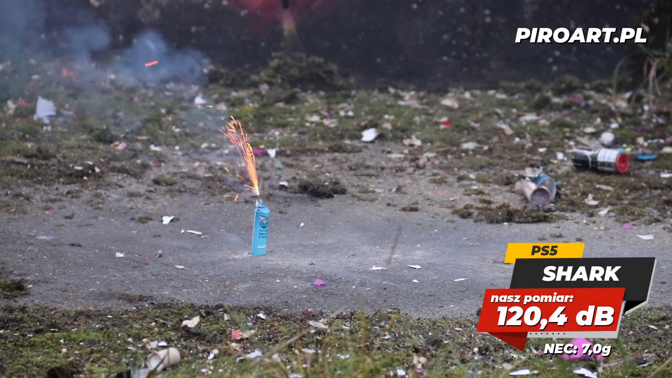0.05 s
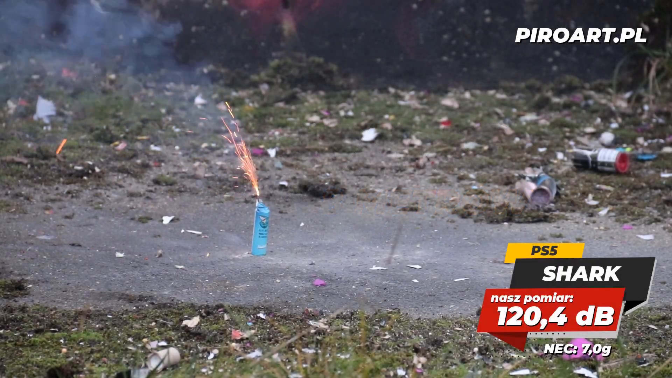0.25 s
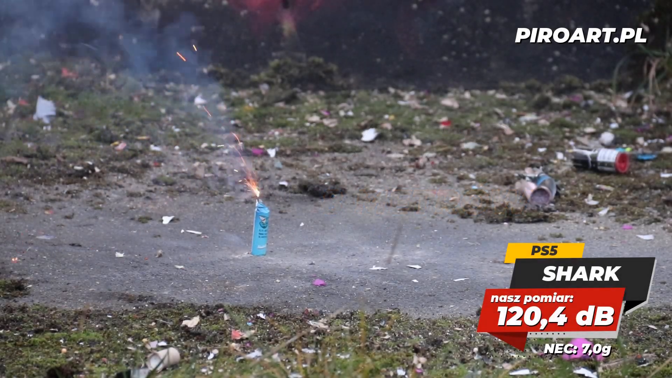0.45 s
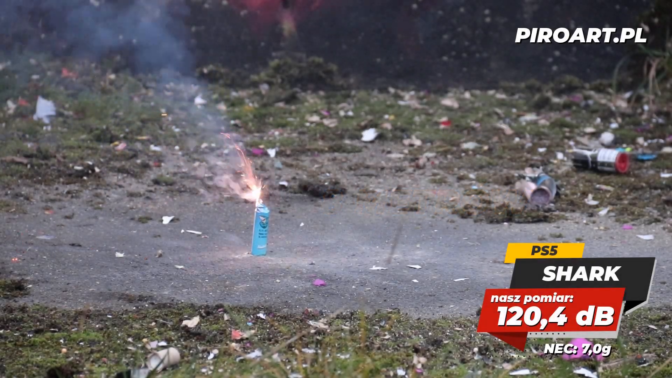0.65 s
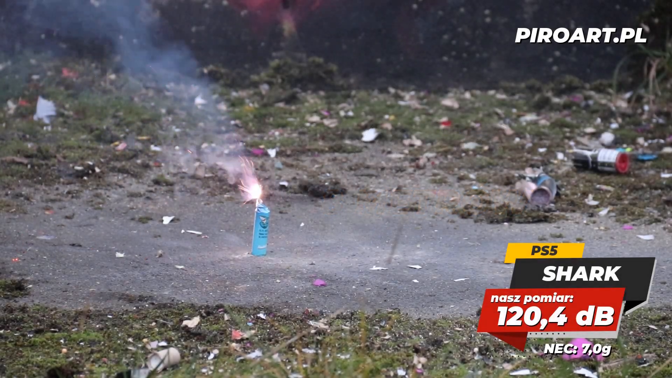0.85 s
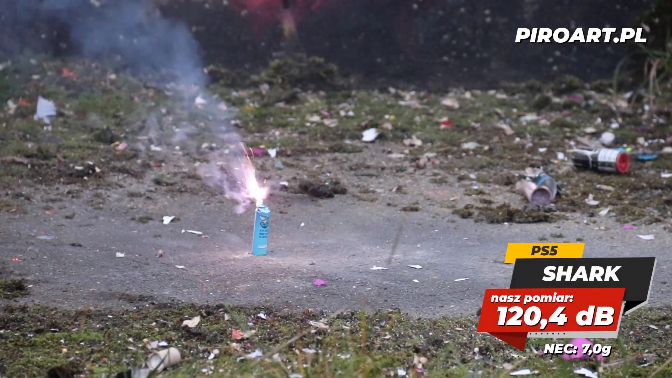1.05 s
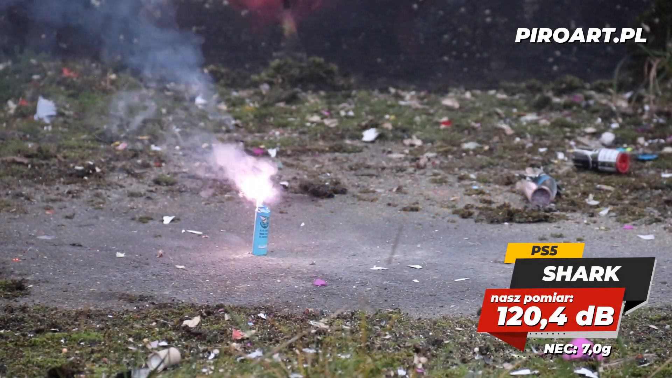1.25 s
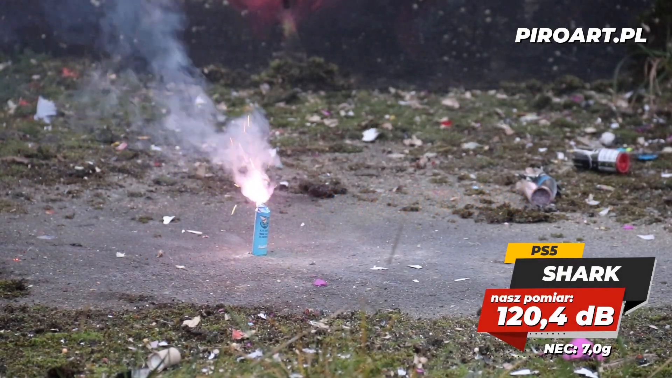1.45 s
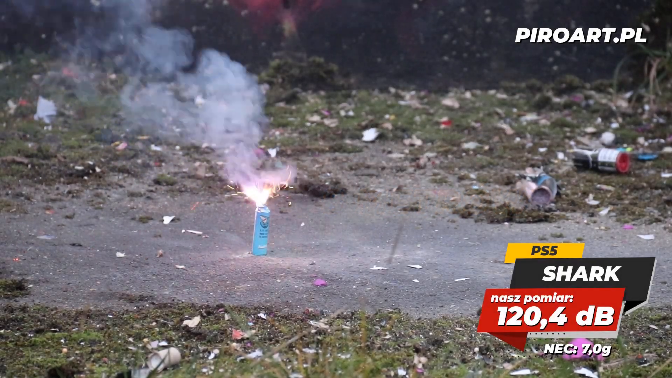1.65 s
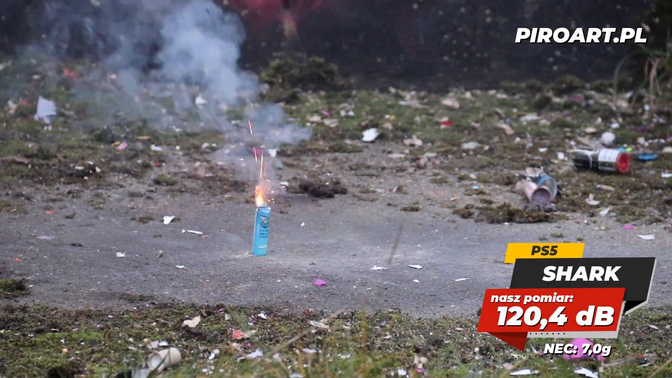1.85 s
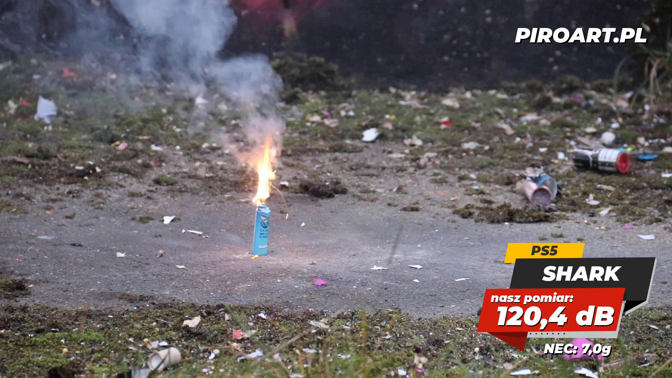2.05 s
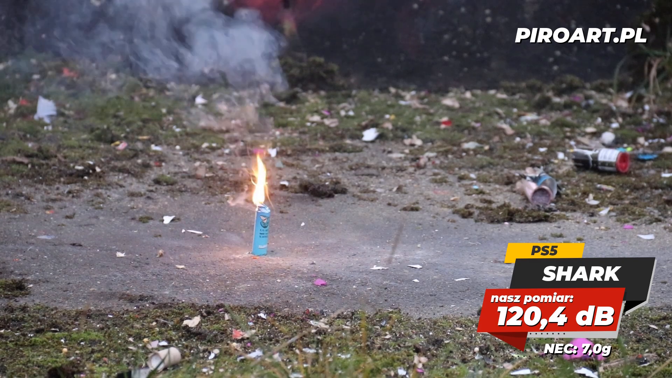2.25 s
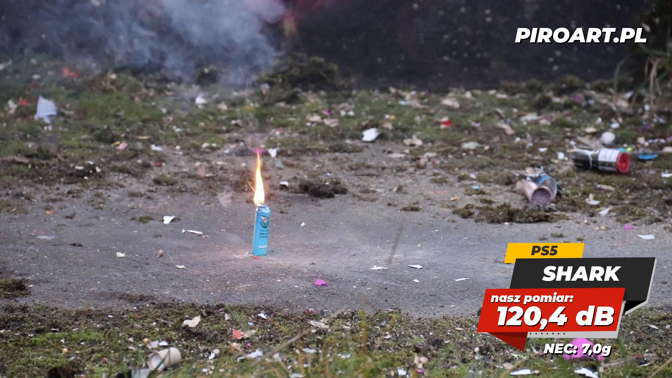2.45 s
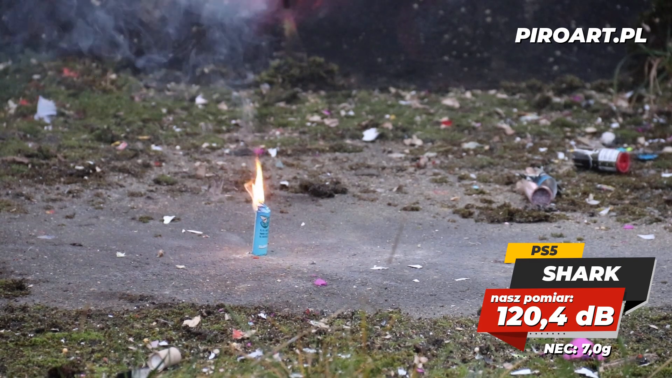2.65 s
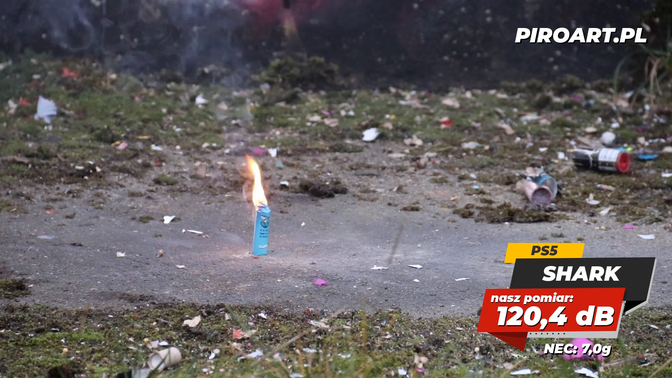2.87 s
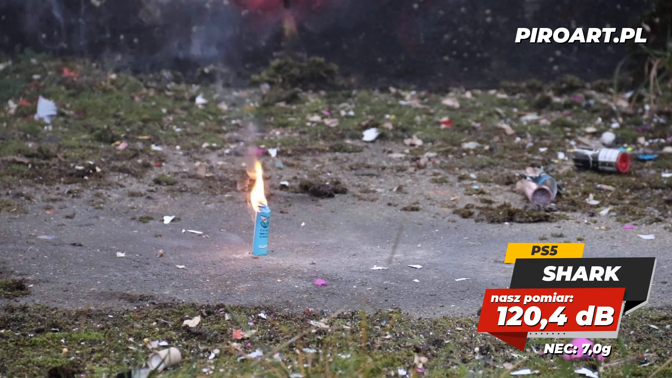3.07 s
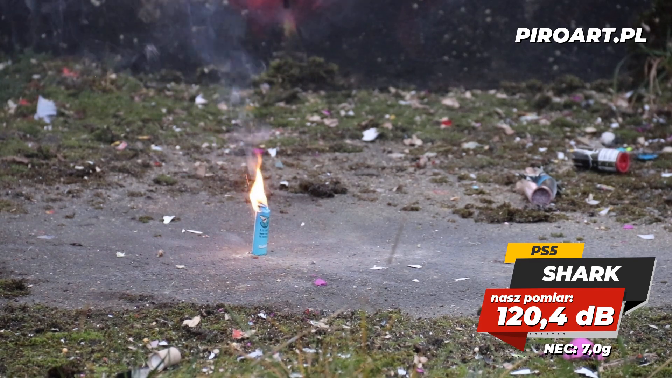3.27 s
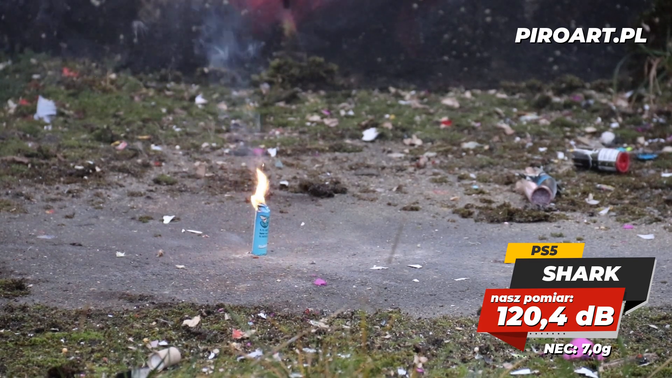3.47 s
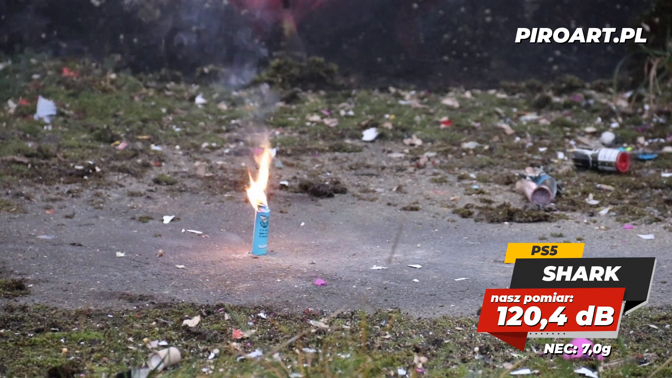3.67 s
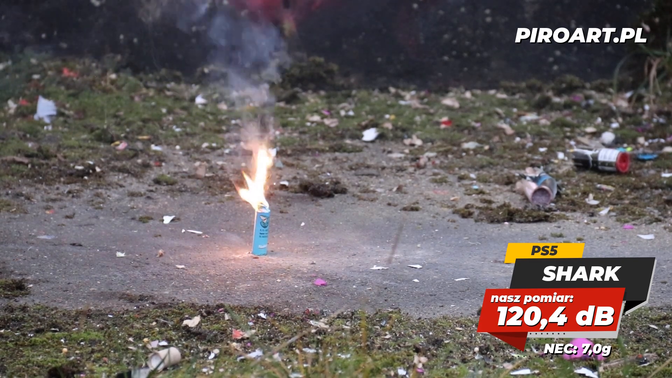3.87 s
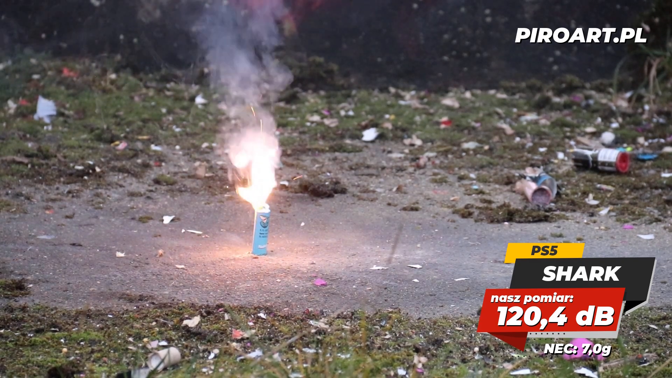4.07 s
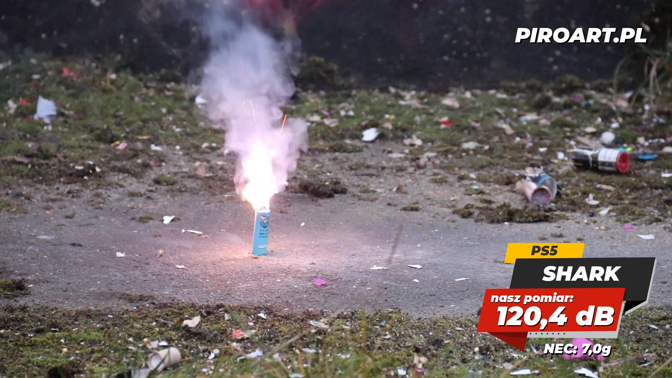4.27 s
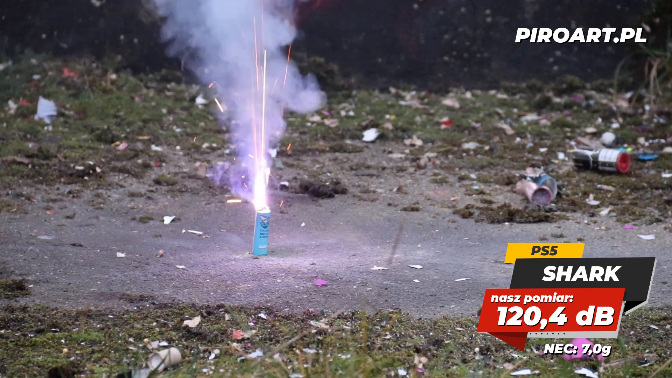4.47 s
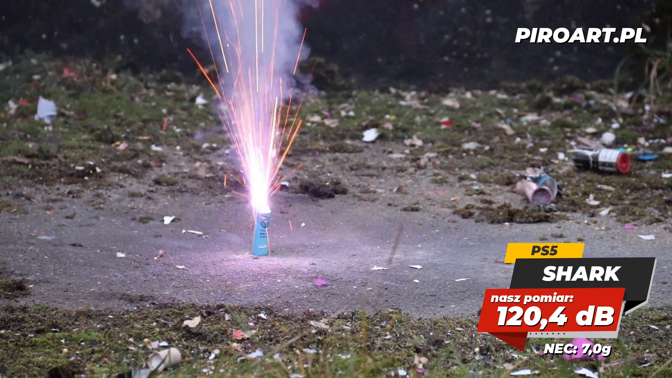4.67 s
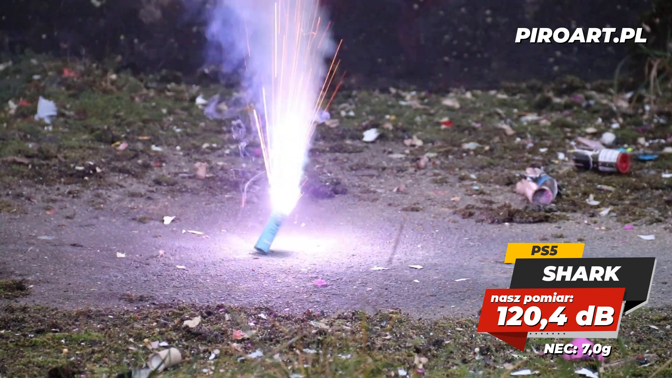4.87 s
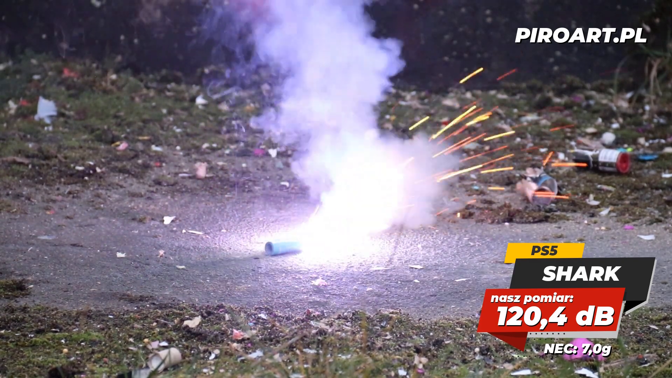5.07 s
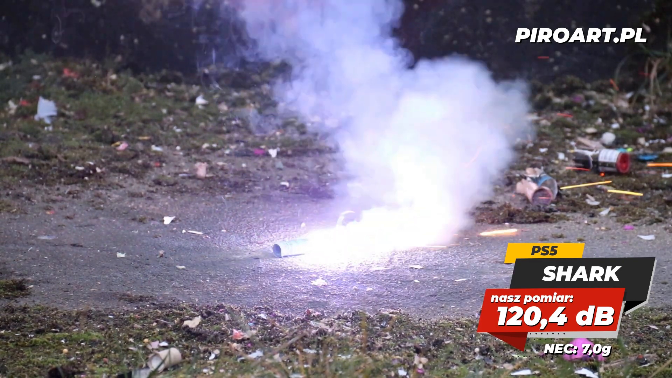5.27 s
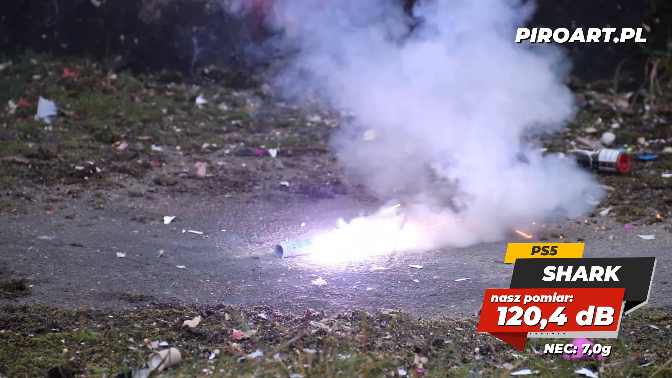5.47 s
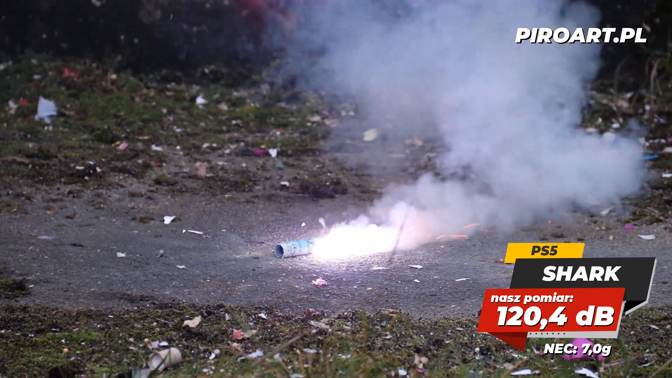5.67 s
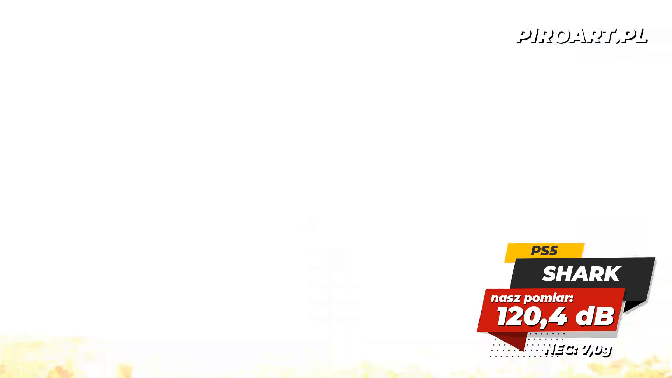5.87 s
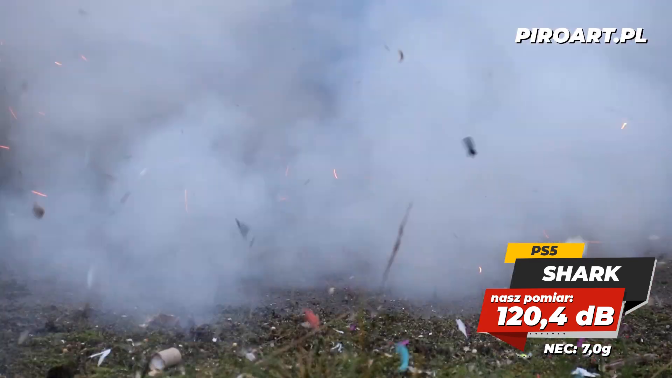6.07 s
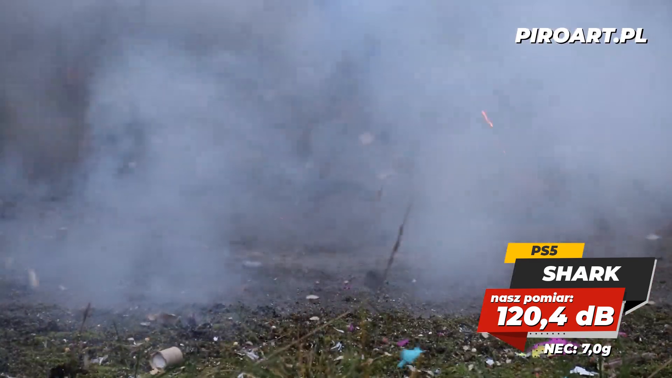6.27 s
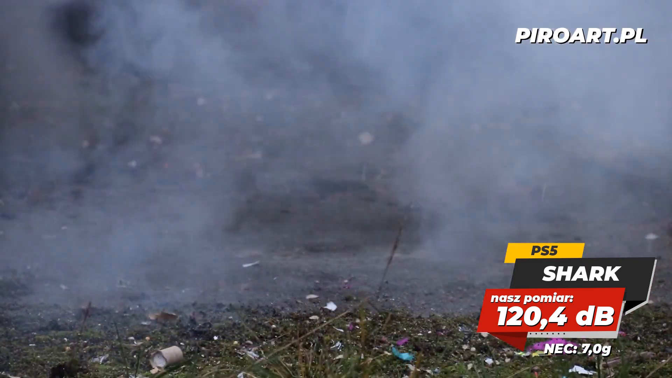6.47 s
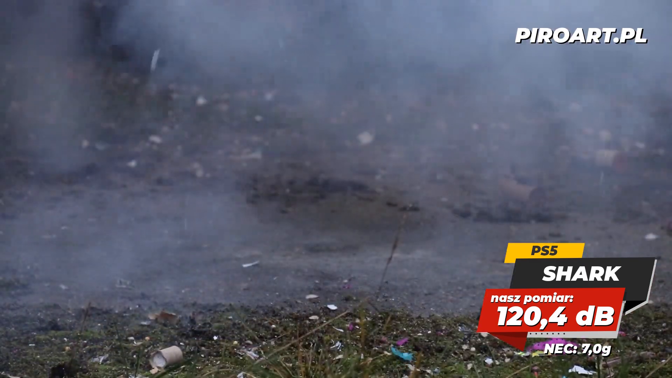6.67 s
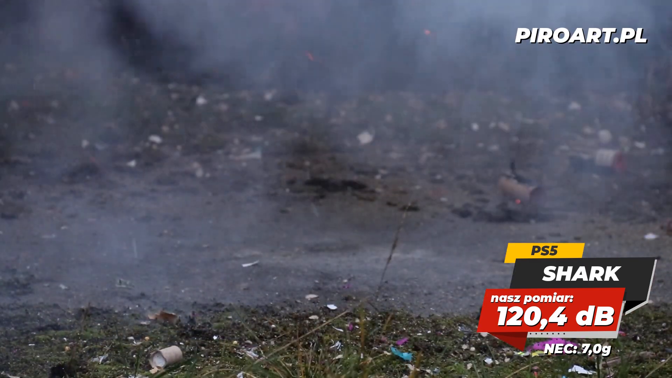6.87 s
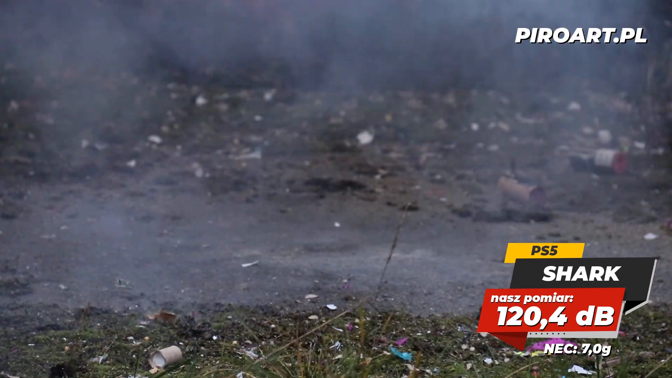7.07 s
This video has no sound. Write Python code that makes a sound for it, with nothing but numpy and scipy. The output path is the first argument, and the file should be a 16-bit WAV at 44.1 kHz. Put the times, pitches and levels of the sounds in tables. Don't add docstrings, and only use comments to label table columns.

```python
import sys
import numpy as np
from scipy import signal
from scipy.fft import rfft, irfft, next_fast_len
from scipy.io import wavfile
from scipy.ndimage import uniform_filter1d, map_coordinates

SR = 44100
rng = np.random.default_rng(int(sys.argv[2]) if len(sys.argv) > 2 else 0)


def waveform_to_disk(signal):
    frames = np.transpose(np.atleast_2d(signal))
    scaled = np.clip(frames, -1, 1) * 32767
    samples = np.round(scaled).astype(np.int16)
    wavfile.write(sys.argv[1], SR, samples)


def gain_from_db(level_db):
    decades = np.asarray(level_db, float) / 20
    return 10 ** decades


N = 314513
T = np.arange(N) / SR

BANG_S = 5.9905
TOPPLE_S, TOPPLE_TAKES_S = 4.917, 0.36
AFTER = np.clip(T - BANG_S, 0, None)
FALLEN = np.clip((T - TOPPLE_S) / TOPPLE_TAKES_S, 0, 1)


def unit(x):
    return x / np.sqrt(np.mean(x ** 2) + 1e-20)


def curves(rows):
    s, *cols = np.transpose(rows)
    return [np.interp(T, s, c) for c in cols]


def wobble(rate):
    knots = rng.standard_normal(int(N * rate / SR) + 4)
    return map_coordinates(knots, [T * rate])


def coloured(x, spectrum):
    m = next_fast_len(N + 8192)
    hz, db = np.transpose(spectrum)
    bins_hz = np.fft.rfftfreq(m, 1 / SR)
    gain = gain_from_db(np.interp(np.log(bins_hz + 1), np.log(hz + 1), db, -120, -120))
    return unit(irfft(rfft(x, m) * gain, m)[:N])


def rush(spectrum, patchy_db, spark_db):
    grain = uniform_filter1d(rng.standard_normal(N), size=24) * np.sqrt(24)
    rough = rng.standard_normal(N) * gain_from_db(spark_db * grain)
    z = signal.stft(rough, nperseg=512)[2]
    field = uniform_filter1d(rng.standard_normal(z.shape), size=7, axis=0)
    field = uniform_filter1d(field, size=10, axis=1)
    patchy = signal.istft(z * gain_from_db(patchy_db * unit(field)), nperseg=512)[1]
    return coloured(patchy[:N], spectrum)


def bursts(rows, rise):
    env = np.zeros(N)
    for s, db, t60 in rows:
        first = int(s * SR) + 1
        t = T[first:][:SR] - s
        env[first:][:SR] += gain_from_db(db - 60 * t / max(t60, .003)) * (1 - np.exp(-t / rise))
    return env


def delayed(x, seconds):
    return map_coordinates(x, [np.arange(N) - seconds * SR], mode="nearest")


def background():
    # pitch_hz, density_db (per Hz)
    town = [(15, -36), (25, -6), (64, 0.5), (179, 0.5), (248, -1.5), (342, -1.5), (449, -7.5), (857, -4.5),
            (1470, -11.5), (2810, -12), (4210, -15.5), (11100, -19.5), (15800, -19)]
    # pitch_hz, density_db (per Hz)
    capsules = [(24, -36), (40, -5), (805, -8), (1980, -7.5), (3990, -9.5), (4410, -1.5), (7280, -8),
                (8670, -5), (15800, -2)]
    open_db, duck_db, duck_s, return_s = -3.5, -15, .015, 1.33
    ducked = (1 - np.exp(-AFTER / duck_s)) * (1 - (AFTER / return_s) ** 2)
    gain = gain_from_db(open_db + duck_db * ducked)
    air = gain_from_db(-50.5) * rush(town, patchy_db=2.5, spark_db=1.3)
    apart = gain_from_db(-58.0) * rush(capsules, patchy_db=1.5, spark_db=.3)
    return gain * np.array([air + apart, air - apart])


def burning():
    # start_s, gas_flow_db, brightness_db
    fuse = [
        (0, -43.2, -0.5),
        (.55, -46, 2),
        (.7, -47.5, 0),
        (0.819, -44.2, 0.5),
        (1.0, -45.5, 1.5),
        (1.17, -49.5, -0.5),
        (1.4, -48, 0.5),
        (1.8, -48.5, 4.5),
        (2.12, -48, 1),
    ]
    # start_s, gas_flow_db, brightness_db
    idle_flame = [
        (2.3, -57, 1),
        (2.7, -57, -2),
        (3.02, -56.4, -2),
        (3.22, -53.5, 1),
        (3.28, -47.5, 0),
        (3.45, -52, 1),
        (4.0, -52, 1.5),
        (4.07, -48, 0),
        (4.42, -45.5, 0),
    ]
    # start_s, gas_flow_db, brightness_db
    jet = [
        (4.47, -33, -6),
        (4.57, -25.5, -3),
        (4.729, -22, 0),
        (4.81, -18.5, 4.5),
        (4.95, -18.8, -3.5),
        (5.04, -21.5, -13),
        (5.32, -30, -2.5),
        (5.55, -38, 2.5),
        (5.95, -45, 1.5),
    ]
    # roar_db, fizz_db, sparks_db, sparks_swing (x brightness), sparks_thin (dB/s)
    stage_mix = [
        (-4, -8.5, -12, 1.1, -2.6),
        (-10.5, -4.5, -7, .9, 14),
        (-9.5, -5.5, -12.5, 1.4, 2),
    ]
    lying_roar_db, burnt_out_s, roar_dies_db_per_s = 13.5, 5.79, 44
    # start_s, level_db, t60_s
    gulps = [(.02, -57, .5), (.78, -52, .4), (.932, -40, 0.22), (1.23, -44, .2), (1.36, -50, 0.89),
             (2.19, -54, .3), (3.27, -68, 0.27), (4.16, -55, 0.18), (4.27, -43.5, 0.69), (4.37, -44, .2),
             (4.455, -32.5, 0.37), (4.69, -33, 0.18), (4.79, -28, 0.27), (4.89, -28, 0.17),
             (5.08, -27, 0.23)]

    rows = []
    for stage, (roar, fizz, spark, swing, thin) in zip([fuse, idle_flame, jet], stage_mix):
        stage_s = stage[0][0]
        for s, flow, bright in stage:
            sparks = flow + spark + swing * bright - thin * (s - stage_s)
            rows.append((s, flow + roar, flow, flow + fizz + bright, sparks))
    roar_db, hiss_db, fizz_db, spark_db = curves(rows)
    roar_db = roar_db + lying_roar_db * FALLEN
    roar_db = roar_db - roar_dies_db_per_s * np.clip(T - burnt_out_s, 0, 1)
    roar_db = 20 * np.log10(gain_from_db(roar_db) + bursts(gulps, rise=0.008))
    return roar_db, hiss_db, fizz_db, spark_db


def flame():
    # pitch_hz, density_db (per Hz)
    roar_colour = [(18, -70), (30, -44), (140, -6), (405, -2), (610, -4.5), (673, -5), (888, -10.5),
                   (1500, -10.5), (1950, -17), (3300, -120)]
    hiss_colour = [(350, -24), (650, -7), (950, -10), (1540, -2.5), (2400, -1), (3100, 0), (3480, -4),
                   (3750, -10), (4300, -16), (5500, -20.5), (7500, -51)]
    fizz_colour = [(2500, -9), (4000, -1), (6000, 1), (8000, -1.5), (9800, -4.5), (10800, -10.5),
                   (12500, -16)]
    spark_colour = [(8500, -30), (10500, -3), (12000, 0), (14000, -1), (15500, -4), (16200, -10)]
    # start_s, peak_db, length_s
    spits = [(0.757, -25, 0.01), (0.974, -33, 0.0083), (2.047, -23, 0.01), (3.439, -34, 0.012),
             (4.063, -28, 0.01), (4.103, -22, 0.01), (4.166, -23, 0.011), (4.181, -26, 0.0089),
             (4.19, -29, 0.008), (4.243, -25, 0.013), (4.276, -29, 0.008), (4.33, -29, 0.0089),
             (4.3755, -24, 0.01), (4.3964, -26, 0.008), (4.475, -15, 0.0085), (5.069, -10.5, 0.018),
             (5.158, -22, 0.01), (5.256, -21, 0.0079), (5.4926, -10, 0.015)]
    # start_s, first_cancelled_hz, strength (0-1)
    ground = [
        (1.44, 3770, .66),
        (1.56, 4170, 0.6),
        (2.3, 4550, 0.6),
        (3.0, 7900, 0.7),
        (3.3, 10900, .12),
        (3.32, 4200, 0),
        (4.4, 4200, 0.24),
        (4.7, 4330, 0.18),
        (5.2, 5100, 0.32),
    ]
    roar_db, hiss_db, fizz_db, spark_db = burning()
    flutter = 0.62 * wobble(14) + 0.53 * wobble(45)
    roar_level = gain_from_db(roar_db + 1.06 * flutter + 1.2 * wobble(15) - 1.5)
    roar = roar_level * rush(roar_colour, patchy_db=1.8, spark_db=1.5)
    hiss = gain_from_db(hiss_db + 1.04 * flutter - 0.58) * rush(hiss_colour, patchy_db=0.98, spark_db=1.5)
    fizz = gain_from_db(fizz_db + 1.13 * flutter - 1.0) * rush(fizz_colour, patchy_db=1.0, spark_db=2.0)
    sparks = gain_from_db(spark_db + 0.97 * flutter - 2.0) * rush(spark_colour, patchy_db=2.0, spark_db=0.5)
    spit = bursts([(s, db - 14.5, 4 * length) for s, db, length in spits], rise=.002)
    spit_jet = 0.78 * hiss / gain_from_db(hiss_db)
    spit_jet += 0.45 * fizz / gain_from_db(fizz_db)
    spit_jet += 0.065 * sparks / gain_from_db(spark_db)
    bright = fizz + sparks + spit * spit_jet
    notch_hz, strength = curves(ground)
    bounce = np.clip(strength, 0, 1) * delayed(bright, 1 / (2 * notch_hz))
    return (roar + hiss + bright + bounce) * (T < BANG_S)


def wall(x):
    upright_ms, fallen_ms, blast_ms = 7.68, 7.2, 8.4
    flame_share, blast_share = 0.54, 0.23
    lit = T < BANG_S - .006
    delay_ms = np.where(lit, upright_ms + (fallen_ms - upright_ms) * FALLEN, blast_ms)
    dull = signal.filtfilt(*signal.butter(1, 9000, fs=SR), x)
    return np.where(lit, flame_share, blast_share) * delayed(dull, delay_ms / 1000)


def puffs():
    # start_s, level_db, t60_s
    gas_puffs = [
        (.55, -57, .3),
        (.93, -42, 0.14),
        (4.09, -45, .3),
        (4.155, -42, .2),
        (4.26, -38.5, 0.35),
        (4.35, -46, .25),
        (4.445, -40, 0.19),
        (5.58, -32, 0.44),
    ]
    hollow = [(60, -30), (110, -5), (150, 3.5), (280, 0), (450, -12), (800, -23)]  # (Hz, dB per Hz)
    return bursts(gas_puffs, rise=0.0097) * rush(hollow, patchy_db=-2.0, spark_db=6.5)


def blast():
    # delay_s (from the bang), size, push_s
    fronts = [
        (-.0012, 1.2, .0025),
        (0, 7, .0008),
        (.0033, 26, .002),
        (.011, 6, .0012),
    ]
    # start_s, level_db, t60_s
    slap_times = [(5.9885, -14, 0.038), (5.9905, -1, 0.023), (5.9918, 19.5, 0.013), (5.998, -1, 0.23),
                  (6.002, -6, 0.044), (6.012, -9, .015), (6.018, -5, 0.02), (6.028, -9, .02),
                  (6.036, 4, 0.049), (6.047, -8, .03), (6.055, -10, 0.028), (6.064, -3, 0.014),
                  (6.072, -9, 0.015), (6.079, -12, .03), (6.088, -10, 0.035), (6.098, -15, 0.03),
                  (6.117, -18, 0.033)]
    push = np.zeros(N)
    for delay, size, length in fronts:
        u = np.clip((T - BANG_S - delay) / length, 0, 50)
        push += size * (1 - u) * np.exp(-u) * (1 - np.exp(-4 * u))
    # (Hz, dB per Hz)
    crack = [(300, -12), (900, -0.5), (2200, 0.5), (3300, -0.5), (4200, -11.5), (8000, -14), (16000, -24.5)]
    scatter = [(3900, -47), (4400, 5), (9000, 2), (13000, 2), (16000, 2)]
    slaps = bursts(slap_times, rise=0.00066)
    apart = gain_from_db(-32.5) * slaps * rush(scatter, patchy_db=4.5, spark_db=-1.0)
    together = push + slaps * rush(crack, patchy_db=2.5, spark_db=4.5)
    return np.array([together + apart, together - apart])


def roll():
    # start_s, strength_db
    echoes = [
        (6.09, -14.5),
        (6.2, -26.5),
        (6.33, -27),
        (6.43, -25.5),
        (6.5, -27.5),
        (6.61, -23.5),
        (6.73, -24),
        (6.85, -27.5),
        (7.1, -31.5),
    ]
    # start_s, level_db, t60_s
    returns = [
        (6.135, -25.5, 0.21),
        (6.165, -31, 0.098),
        (6.35, -35, 0.16),
        (6.367, -32, .2),
        (6.42, -34, .15),
        (6.532, -33, 0.23),
        (6.567, -27, 0.19),
        (6.666, -31, 0.18),
        (6.943, -38, 0.11),
        (6.997, -39, .15),
    ]
    # start_s, level_db, t60_s
    surges = [
        (6.2, -22, 0.12),
        (6.258, -15.5, 0.27),
        (6.345, -19, 0.14),
        (6.372, -11, .1),
        (6.425, -9, .12),
        (6.445, -25, 0.092),
        (6.485, -15, .15),
        (6.518, -20, 0.14),
        (6.572, -20, .12),
        (6.603, -14, 0.15),
    ]
    # pitch_hz, density_db (per Hz)
    thud_colour = [(20, -49.5), (50, -21), (72, -4.5), (88, -1.5), (125, -4.5), (160, -4.5), (220, -39)]
    boom_colour = [(70, -39), (120, -8.5), (160, 0), (200, 2.5), (250, 1.5), (340, -6.5), (420, -9.5),
                   (600, -23), (900, -43)]
    clatter_colour = [(210, -30), (350, -5), (408, -3.5), (577, -6), (916, -4.5), (1490, -9), (1650, -10),
                      (2050, -10), (2620, -12.5), (3220, -10.5), (7500, -55.5), (9750, -76), (16500, -120)]
    sizzle_colour = [(2500, -19), (4000, 7), (5000, 1.5), (6500, -6), (8500, -15), (12000, -29),
                     (16000, -33)]
    boom_over_echoes_db, boom_thins_db_per_s = 11, 10.5
    sizzle_under_db, air_loss_db, air_loss_grows = -13.5, 18, 2.2
    thud_s, thud_peak_db, swell_db_per_s, fade_db_per_s = 6.66, -15, 42, 53
    overload_db, overload_s = 21, .14

    echo_db = curves(echoes)[0]
    clatter_db = 20 * np.log10(gain_from_db(echo_db) + bursts(returns, rise=0.0033))
    boom_db = echo_db + boom_over_echoes_db - boom_thins_db_per_s * AFTER
    sizzle_db = clatter_db + sizzle_under_db - air_loss_db * AFTER ** air_loss_grows
    thud_slope = np.where(T < thud_s, swell_db_per_s, fade_db_per_s)
    thud_db = thud_peak_db - thud_slope * np.abs(T - thud_s)
    excess_db = overload_db * np.exp(-(AFTER / overload_s) ** 1.5)
    lumps = 1.13 * wobble(22)
    late = np.clip((T - 6.0) / 0.1, 0, 1)
    low = late * gain_from_db(thud_db) * rush(thud_colour, patchy_db=-1.0, spark_db=1.5)
    boom = gain_from_db(boom_db + excess_db + 0.84 * lumps) + bursts(surges, rise=0.0051)
    low += boom * rush(boom_colour, patchy_db=0.5, spark_db=1.0)
    high = gain_from_db(clatter_db + 1.26 * lumps) * rush(clatter_colour, patchy_db=1.1, spark_db=1.0)
    high += gain_from_db(sizzle_db + .9 * lumps) * rush(sizzle_colour, patchy_db=1.5, spark_db=-3.0)
    return low * np.clip((T - BANG_S - .004) / 0.0044, 0, 1) + high * late


def scene():
    near = flame() + puffs() + blast()
    return near + wall(near.mean(axis=0)) + roll() + background()


def roll_off(x):
    return signal.sosfilt(signal.butter(12, 16420, fs=SR, output="sos"), x)


def record(dry):
    ceiling_db, headroom_db, clamp_s, recover_db_per_s = -9.5, 21, 0.0059, 8
    mid, side = (dry[0] + dry[1]) / 2, (dry[0] - dry[1]) / 2
    lift, flat = signal.bilinear([1 / (2 * np.pi * 2500), 1], [1 / (2 * np.pi * 10000), 1], SR)
    clamp_db = headroom_db * np.exp(-(AFTER / clamp_s) ** 2)
    top = gain_from_db(ceiling_db + clamp_db + recover_db_per_s * AFTER)
    x = signal.lfilter(lift, flat, mid)
    x = x / (1 + np.abs(x / top) ** 3) ** (1 / 3)
    x = signal.lfilter(flat, lift, x)
    x = x + 0.12 * signal.lfilter(*signal.butter(2, 900, "high", fs=SR), mid - x)
    x = signal.lfilter(*signal.butter(1, 30, "high", fs=SR), x)
    band_limit = signal.ellip(10, .1, 60, 15800, fs=SR, output="sos")
    pair = signal.sosfiltfilt(band_limit, [x + side, x - side])
    return roll_off(np.clip(pair, -.96, .96))


dry = scene()
out = record(dry)
waveform_to_disk(out)
```